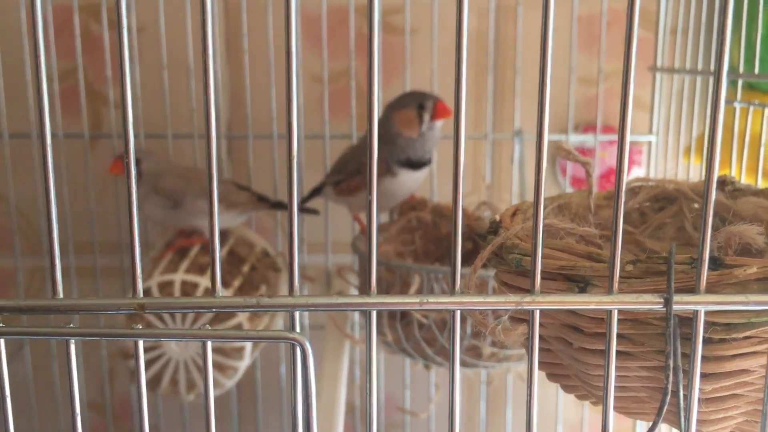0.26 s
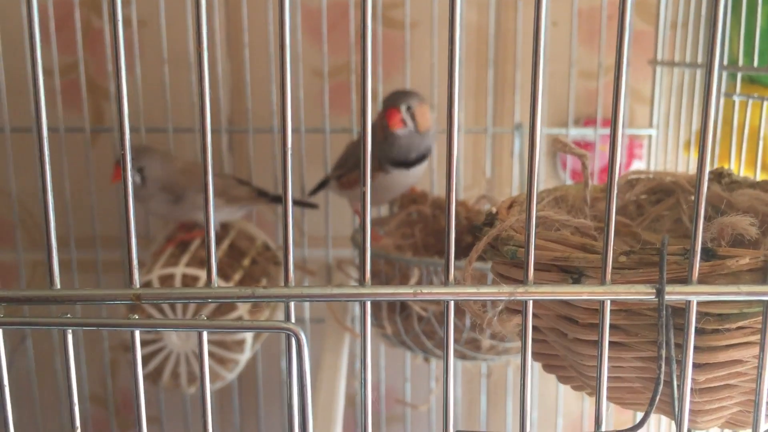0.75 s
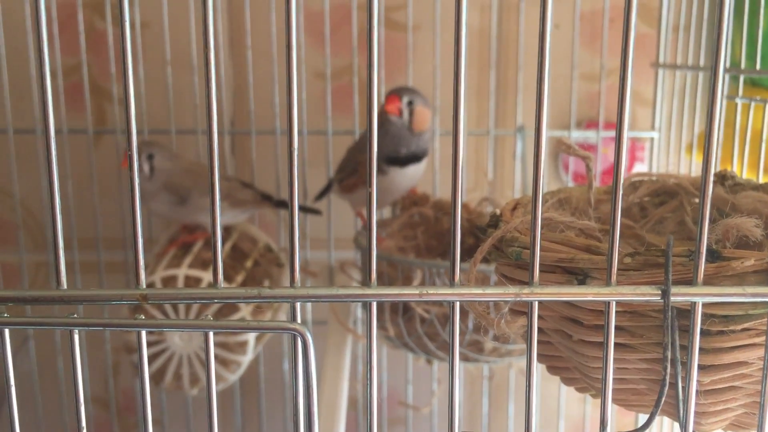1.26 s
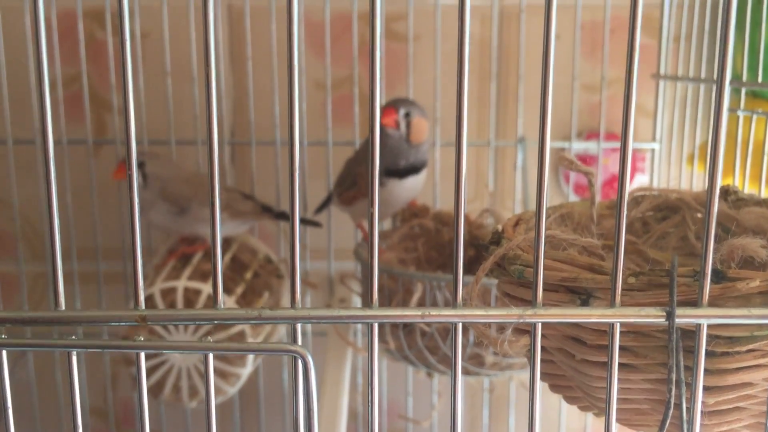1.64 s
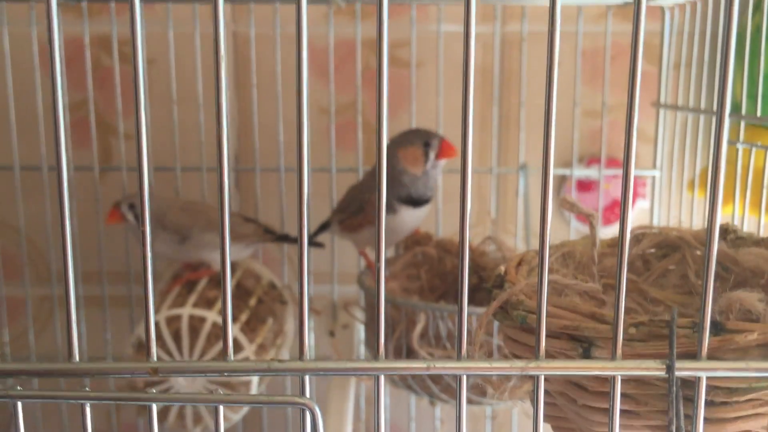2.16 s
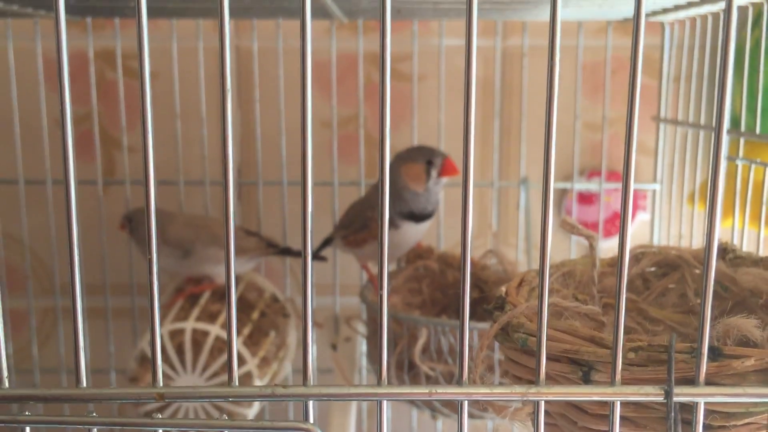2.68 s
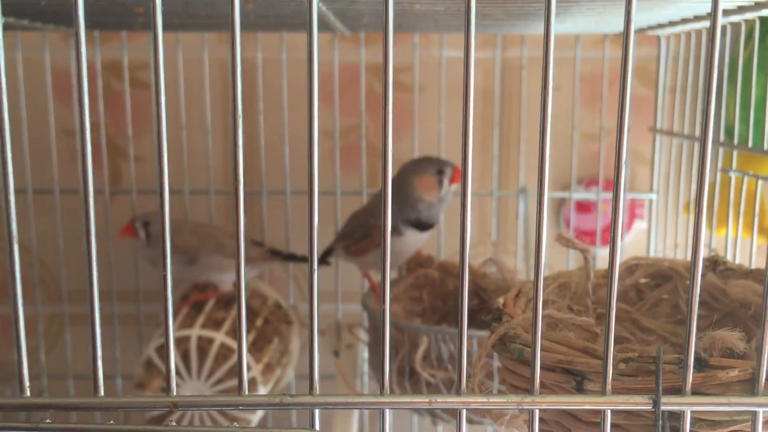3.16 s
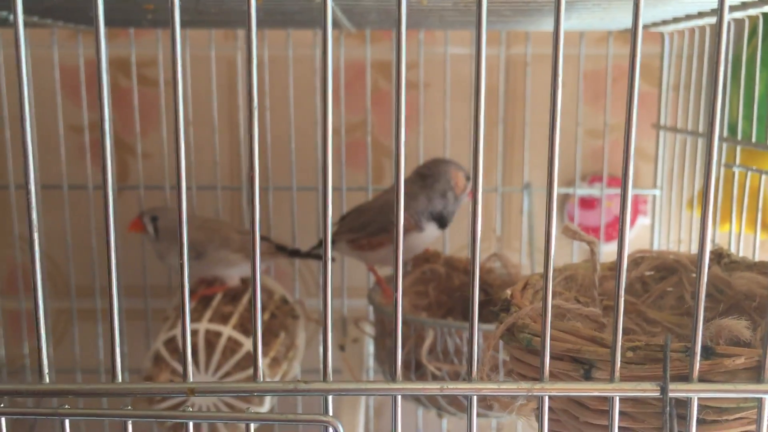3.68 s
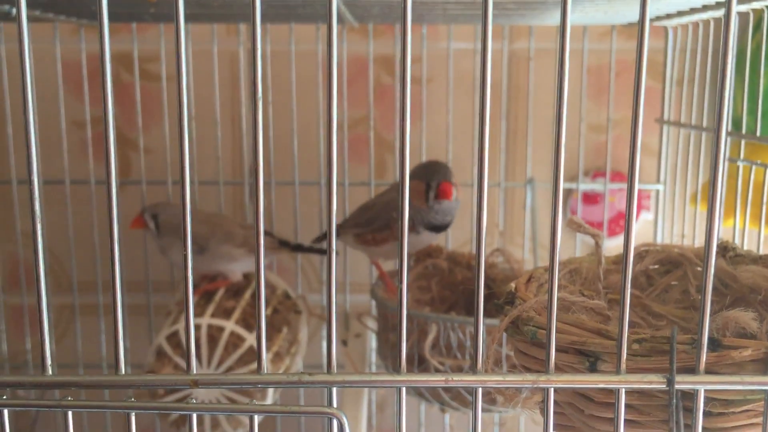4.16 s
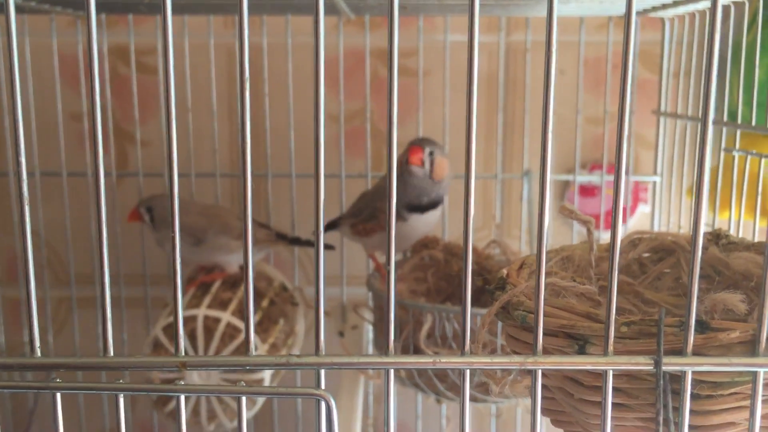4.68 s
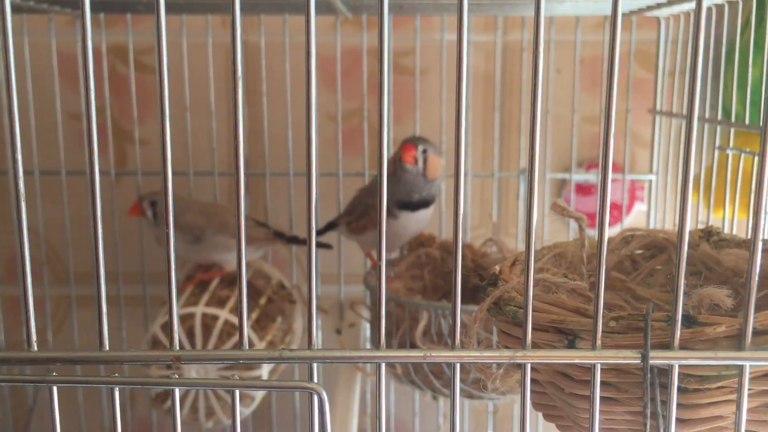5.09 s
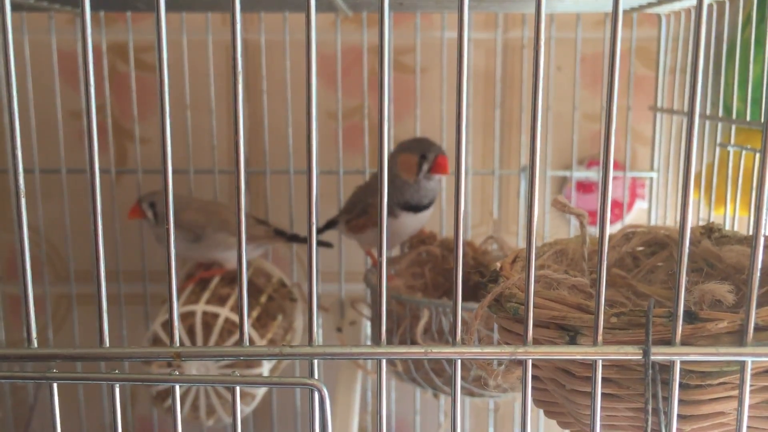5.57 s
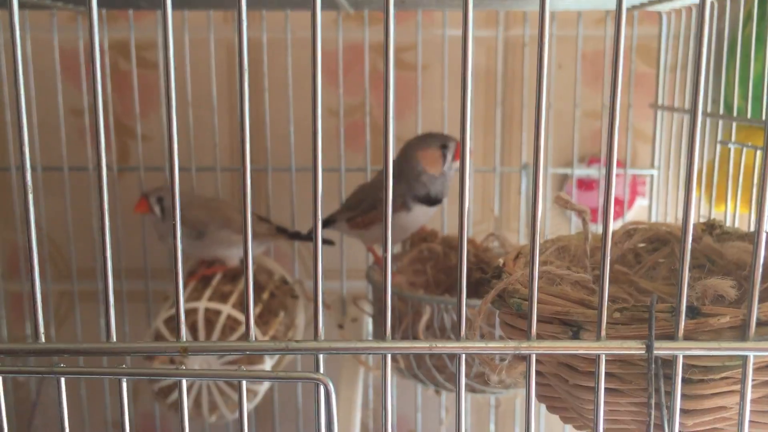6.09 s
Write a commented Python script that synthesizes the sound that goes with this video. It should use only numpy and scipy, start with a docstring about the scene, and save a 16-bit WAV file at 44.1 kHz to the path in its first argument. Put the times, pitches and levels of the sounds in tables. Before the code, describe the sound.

Close to a cage indoors, a small finch repeats a short phrase of rasps, thin whistles and nasal buzzes three times, its claws lightly scratching now and then. In the middle it switches to separate calls, two sharp falling cries and a harsh croak, then sings the phrase twice more. Soft room air and a faint electrical hum lie behind, with a slight echo from the walls.

```python
"""A young zebra finch sings in a cage in a small room, over air, mains hum and a low rumble. Pulses of the
syrinx ring its throat and beak; near surfaces and walls answer. It opens with two runs of its motif (slur,
stack, two-voiced rasp, whistle, slur, buzz, long nasal note); claws scratch and faint tones ring. A call and a
slur lead to a third run at 2 s, and another bird peeps softly. From 3 s come a call, a whine, a loud falling
cry, a call, a second cry and a croak. Two more runs close the scene from 5 s."""
import sys
import numpy as np
from scipy import signal
from scipy.fft import rfft, irfft
from scipy.io import wavfile
from scipy.ndimage import uniform_filter1d

SR = 44100
rng = np.random.default_rng(int(sys.argv[2]) if len(sys.argv) > 2 else 0)


def materialize(psi):
    """Save the field psi as 16-bit PCM at rate SR to the path in sys.argv[1].

    A 1-D psi becomes a single channel; in a 2-D psi each row is a channel.
    """
    bounded = np.clip(np.atleast_2d(psi).T, -1, 1)
    quanta = np.round(bounded * 32767).astype(np.int16)
    wavfile.write(sys.argv[1], SR, quanta)


N = 279153
TOP_HZ = 16100


def undb(db):
    """Decibels to gain."""
    return 10 ** (np.asarray(db) / 20)


def unit(x):
    """Scale to rms 1."""
    return x / np.sqrt(np.mean(x ** 2) + 1e-18)


def add(out, start_s, x):
    """Mix x into out from start_s on."""
    i = int(round(start_s * SR))
    x = x[max(-i, 0):max(N - i, 0)]
    out[max(i, 0):max(i, 0) + len(x)] += x


def wander(hz, count):
    """Random drift of rms 1, low-passed at hz."""
    lowpass = signal.butter(2, min(hz, SR / 3), fs=SR, output="sos")
    return unit(signal.sosfilt(lowpass, rng.standard_normal(count)))


def colour(x, points, tilt_db_oct=0, size=1024):
    """Minimum-phase filter through (frequency [Hz], gain [dB]) points, plus a tilt."""
    hz, db = np.transpose(points)
    octave = np.log2(np.maximum(np.fft.rfftfreq(size, 1 / SR), 1))
    curve_db = np.interp(octave, np.log2(hz), db + tilt_db_oct * np.log2(hz / hz.mean()))
    cepstrum = irfft(np.log(undb(curve_db)))
    cepstrum[1:size // 2] *= 2
    cepstrum[size // 2 + 1:] = 0
    return signal.fftconvolve(x, irfft(np.exp(rfft(cepstrum))))[:len(x)]


# Noise spectra: (frequency [Hz], relative level [dB])
AIR_SPECTRUM = [(15, -50.5), (25, -12.5), (166, -9), (190, -7), (229, -12), (301, -6), (405, -17.5),
                (451, -19.5), (659, -20), (754, -24), (1480, -19.5), (1610, -25), (2110, -22),
                (2910, -28.5), (16000, -40)]
RUMBLE_SPECTRUM = [(50, -23), (90, -15), (115, 1), (160, -13), (260, -14.5), (700, -22.5), (2000, -58.5)]
# Mains harmonics: (frequency [Hz], rms level [dB])
HUM_LINES = [(100, -84), (199.5, -71), (299.5, -69), (399, -79.5)]


def background(air_db=-63, waver_db=2, rest_db=-74.5, swell_db=-54, peak_s=0.66, rise_s=0.14, fall_s=0.55):
    """Room air, a wavering mains hum and a low rumble that swells once and dies back."""
    t = np.arange(N) / SR
    air = unit(colour(rng.standard_normal(N), AIR_SPECTRUM, size=8192)) * undb(air_db)
    hum = np.zeros(N)
    for hz, db in HUM_LINES:
        amplitude = np.sqrt(2) * undb(db + waver_db * wander(1.1, N))
        hum += amplitude * np.sin(2 * np.pi * hz * t + 0.88 * wander(7.4, N))
    swell = np.exp(-np.maximum((peak_s - t) / rise_s, (t - peak_s) / fall_s))
    rumble = unit(colour(rng.standard_normal(N), RUMBLE_SPECTRUM, size=8192))
    return air + hum + rumble * (undb(rest_db) + undb(swell_db) * swell)


def gesture(length_s, start_hz, turn_hz, turn_s, end_hz, glide_s,
            attack_s, swell_db, release_s, rough, rough_end, linger=1):
    """Tension and air pressure in a syllable: (time [s], pitch [Hz], level [dB], roughness [0-1])."""
    t = np.linspace(0, length_s, 200)
    glide = np.exp(-(np.maximum(t - turn_s, 0) / glide_s) ** linger)  # linger > 1 rounds the turn
    onset_hz = start_hz + (turn_hz - start_hz) * t / turn_s
    hz = np.where(t < turn_s, onset_hz, end_hz + (turn_hz - end_hz) * glide)
    pressure = np.clip(np.minimum(t / attack_s, (length_s - t) / release_s), 0.1, 1)
    db = 20 * np.log10(pressure) + swell_db * (t - length_s / 2) / length_s
    roughness = np.clip(rough + (rough_end - rough) * t / length_s, 0, 1)
    return np.column_stack([t, hz, db, roughness])


def syrinx(curve, throat, twin=0, air_db=0, pitch=1, stretch=1, tilt_db_oct=0,
           jitter=0.099, shimmer=0.65, smear_rad=0.11, pure_hz=2500, air_tilt_db_oct=2.5, edge_s=0.00068):
    """Uneven pulses and a puff of air once a cycle ring the throat; air pressure sets the level."""
    times, *columns = np.transpose(curve)
    times = np.maximum.accumulate(times - times[0]) * stretch
    t = np.arange(int(times[-1] * SR)) / SR
    hz, db, rough = (np.interp(t, times, column) for column in columns)
    hz = hz * pitch * (1 + jitter * rough * wander(900, len(t)))
    phase = 2 * np.pi * np.cumsum(hz) / SR
    k = np.arange(1, int(TOP_HZ / hz.min()) + 1)[:, None]
    twin_gain = 1 + twin * (-1.0) ** k  # a mid-cycle pulse weakens odd harmonics
    rolloff = k ** -(hz / pure_hz) ** 2  # tight membranes swing more like a sine
    harmonics = twin_gain * rolloff * (k * hz < TOP_HZ)
    pulses = (harmonics * np.cos(k * phase - smear_rad * k ** 2)).sum(0)  # high harmonics lag at closure
    pulses /= np.sqrt((harmonics ** 2).sum(0) / 2)
    puffs = (1 + np.cos(phase)) * rng.standard_normal(len(t)) * rough * undb(air_db)
    pulses *= 1 + shimmer * rough * wander(700, len(t))
    voice = colour(pulses, throat, tilt_db_oct) + colour(puffs, throat, tilt_db_oct + air_tilt_db_oct)
    power = uniform_filter1d(uniform_filter1d(voice ** 2, size=200), size=200)
    fade = np.clip(np.minimum(t, t[-1] - t) / edge_s, 0, 1)
    return voice / np.sqrt(power + 1e-12) * undb(db) * fade


# Near surfaces: (delay [s], gain re direct sound [ratio])
NEAR_ECHOES = [(.001, 0.048), (.0018, 0.16), (.0055, 0.11), (.01, 0.14)]


def room(x, wet_db, t60_s=0.25, build_s=0.007, treble_db=-3, cage_db=-3, cage_s=0.0012):
    """Cage scatter, near echoes and a short tail; new for each sound, as the bird keeps turning its head."""
    t = np.arange(SR // 2) / SR
    tail = rng.standard_normal(len(t)) * np.exp(-np.log(1000) * t / t60_s) * (1 - np.exp(-t / build_s))
    tail = colour(unit(tail), [(500, 0.45), (3500, 0.94), (9000, treble_db)])
    cage = unit(rng.standard_normal(len(t)) * t * np.exp(-t / cage_s))
    response = (undb(wet_db) * tail + undb(cage_db) * cage) / np.sqrt(len(t))
    response[0] += 1
    for delay_s, gain in NEAR_ECHOES:
        response[int(delay_s * SR)] += gain
    heard = signal.fftconvolve(x, response)
    return heard * np.linalg.norm(x) / np.linalg.norm(heard)


def sing(pitch=1, stretch=1, bright_db_oct=0, room_db=0, *,
         throat, db, tilt_db_oct, air_db, wet_db, twin=0, **shape):
    """One syllable in the room; pitch and stretch scale its nominal frequencies and times."""
    voice = syrinx(gesture(**shape), throat, twin, air_db, pitch, stretch, tilt_db_oct + bright_db_oct)
    return room(voice, wet_db + room_db) * undb(db)


# Throat and beak responses: (frequency [Hz], gain [dB])
OPEN_THROAT = [(300, -41.5), (540, -6.5), (1030, -2), (1560, -9), (2100, -1), (2900, -3), (4200, -14),
               (5400, -11.5), (7800, -11), (9700, -16), (12300, -27.5), (16000, -50)]
HARSH_THROAT = [(300, -29), (630, -18), (1270, -3.5), (1900, -10), (2250, -8.5), (3100, -0.5), (4300, -3),
                (5500, -3), (7500, -16.5), (9500, -18.5), (12000, -29), (16000, -51)]
ROUND_THROAT = [(500, -9.5), (1200, -13.5), (1800, -2.5), (3600, -13.5), (5400, -13), (7200, -24.5),
                (9000, -31), (16000, -61)]
SLUR = dict(length_s=0.057, start_hz=1160, turn_hz=997, turn_s=0.004, end_hz=391.5, glide_s=0.013,
            attack_s=0.013, swell_db=0, release_s=0.014, rough=0.05, rough_end=0.11,
            throat=OPEN_THROAT, db=-42, tilt_db_oct=0.5, air_db=-4, wet_db=-3.5)
STACK = dict(length_s=0.028, start_hz=601.4, turn_hz=653.4, turn_s=0.017, end_hz=486, glide_s=0.018,
             attack_s=0.0036, swell_db=3, release_s=0.0031, rough=0.06, rough_end=0.19, twin=0.34,
             throat=HARSH_THROAT, db=-31.5, tilt_db_oct=-2.5, air_db=-4, wet_db=0)
RASP = dict(length_s=0.029, start_hz=1395, turn_hz=1505, turn_s=0.017, end_hz=640, glide_s=0.024,
            attack_s=0.007, swell_db=1, release_s=0.0082, rough=0.81, rough_end=0.9,
            throat=HARSH_THROAT, db=-25, tilt_db_oct=1, air_db=0, wet_db=-5)
PIPE = dict(length_s=0.043, start_hz=1702, turn_hz=1770, turn_s=0.01, end_hz=1772, glide_s=0.012,
            attack_s=0.012, swell_db=2.5, release_s=0.0057, rough=0.13, rough_end=0.03,
            throat=ROUND_THROAT, db=-35, tilt_db_oct=3, air_db=2, wet_db=-11.5)
DROP = dict(length_s=0.025, start_hz=605, turn_hz=584, turn_s=0.004, end_hz=480, glide_s=0.02,
            attack_s=0.0011, swell_db=-6.5, release_s=0.002, rough=0.3, rough_end=0.38,
            throat=ROUND_THROAT, db=-38, tilt_db_oct=2, air_db=2, wet_db=-1)
# Motif, first half: (rasp time [s], slur lead [s], rasp pitch [ratio], pipe length [ratio],
# pipe gain [dB], room tail gain [dB])
MOTIF_OPENINGS = [(-.008, 0.1, 0.99, 1.01, 4, -1.5), (.761, 0.13, 1.125, 1.05, -.5, -0.5),
                  (2.098, .144, 0.94, 0.87, 1, 1.5), (5.14, .15, .99, 1.03, 3, -3),
                  (5.915, 0.15, 1.03, 0.9, 0.5, -2)]


def motif_openings(stack_lead_s=0.0402, pipe_lag_s=0.002, drop_lag_s=0.047):
    """Slur, stack, then rasp and pipe from the two sides of the syrinx at once, ending in a low drop."""
    out = np.zeros(N)
    for s, slur_lead_s, rasp_pitch, pipe_stretch, pipe_db, room_db in MOTIF_OPENINGS:
        add(out, s - slur_lead_s, sing(**SLUR))
        add(out, s - stack_lead_s, sing(room_db=room_db, **STACK))
        add(out, s, sing(rasp_pitch, room_db=room_db, **RASP))
        add(out, s + pipe_lag_s, sing(stretch=pipe_stretch, room_db=room_db, **PIPE) * undb(pipe_db))
        add(out, s + drop_lag_s * pipe_stretch, sing(room_db=room_db, **DROP))
    return out


def crack(spectrum, decay_s):
    """A very short burst of coloured noise."""
    t = np.arange(SR // 40) / SR
    return colour(rng.standard_normal(len(t)) * np.exp(-t / decay_s), spectrum)


# Throat and beak responses: (frequency [Hz], gain [dB])
THIN_THROAT = [(1500, -37), (2800, -5), (5600, 2), (8400, -15), (11200, -14.5), (14000, -38), (16000, -41)]
PULSE_THROAT = [(400, -17.5), (800, -5), (1300, -1.5), (2200, -2.5), (3200, 1.5), (4400, -1.5), (6200, -4),
                (8000, -23), (16000, -33)]
NASAL_THROAT = [(300, -35), (455, -23), (900, -12), (1340, -3), (1750, -11), (2250, 0), (3100, 0),
                (4160, -2), (5000, -11.5), (5900, -19.5), (7800, -28.5), (9300, -18.5), (11100, -38),
                (16000, -45)]
WHISTLE = dict(length_s=0.021, start_hz=2940, turn_hz=2792, turn_s=0.0025, end_hz=2721, glide_s=0.0049,
               attack_s=0.0023, swell_db=-4.5, release_s=0.0073, rough=0.022, rough_end=0.02,
               throat=THIN_THROAT, db=-23.5, tilt_db_oct=-0.5, air_db=10, wet_db=-6)
FLICK = dict(length_s=0.0091, start_hz=4600, turn_hz=4210, turn_s=0.00233, end_hz=2836, glide_s=0.00195,
             attack_s=0.001, swell_db=2.5, release_s=0.0018, rough=0.03, rough_end=0.05,
             throat=HARSH_THROAT, db=-28, tilt_db_oct=-0.5, air_db=-4, wet_db=3)
BUZZ = dict(length_s=0.038, start_hz=1593.5, turn_hz=1093, turn_s=0.004, end_hz=613.5, glide_s=0.003,
            attack_s=0.003, swell_db=-1, release_s=0.006, rough=0.48, rough_end=0.2,
            throat=HARSH_THROAT, db=-28.2, tilt_db_oct=-1, air_db=7, wet_db=-4.5)
NASAL = dict(length_s=0.142, start_hz=418.4, turn_hz=408, turn_s=0.015, end_hz=456.4, glide_s=0.024,
             attack_s=0.023, swell_db=3, release_s=0.013, rough=0.14, rough_end=0.27,
             throat=NASAL_THROAT, db=-31, tilt_db_oct=0.5, air_db=-17, wet_db=-4.5)
# Lone syrinx pulses: (lead before the flick [s], relative level [dB])
LONE_PULSES = [(0.018, -16.5), (.0085, -12.5)]
# Motif, second half: (whistle time [s], whistle pitch [ratio], whistle length [ratio],
# whistle tilt [dB/oct], slur pitch [ratio], flick and buzz pitch [ratio], nasal pitch [ratio],
# nasal length [ratio], nasal gain [dB], extra nasal swell [dB])
MOTIF_ENDINGS = [(.081, 0.99, 1.07, 1.5, 0.95, 1, 1, 1.01, 1, 0.5),
                 (0.857, 0.98, 0.88, 0, 1.13, 0.97, .985, 0.92, -0.5, 1.5),
                 (2.192, 1.044, 1.36, 2, 1.07, 1.01, 1.005, 1.03, 0, -0.5),
                 (5.233, 1.012, 0.94, 3, 1.04, 1.015, .995, 0.97, 0, 3),
                 (6.006, 0.98, 1.02, 2, 1.12, 1, 1.005, 1.6, 3, -1.5)]


def motif_endings(slur_lag_s=0.029, flick_lag_s=0.152, buzz_lag_s=0.162, nasal_lag_s=0.291,
                  slur_gain_db=0.5, pulse_gain_db=-6):
    """Whistle, slur, two lone pulses of the syrinx, a flick down into the buzz, and the long nasal note."""
    out = np.zeros(N)
    for (s, pitch, stretch, bright_db_oct, slur_pitch, buzz_pitch,
         nasal_pitch, nasal_stretch, nasal_db, swell_db) in MOTIF_ENDINGS:
        add(out, s, sing(pitch, stretch, bright_db_oct, **WHISTLE))
        add(out, s + slur_lag_s, sing(slur_pitch, bright_db_oct=1.03, **SLUR) * undb(slur_gain_db))
        for lead_s, pulse_db in LONE_PULSES:
            pulse = room(crack(PULSE_THROAT, decay_s=0.0017), wet_db=-0.5)
            add(out, s + flick_lag_s - lead_s, pulse * undb(pulse_db + pulse_gain_db))
        add(out, s + flick_lag_s, sing(buzz_pitch, **FLICK))
        add(out, s + buzz_lag_s, sing(buzz_pitch, **BUZZ))
        nasal = dict(NASAL, swell_db=NASAL["swell_db"] + swell_db)
        add(out, s + nasal_lag_s, sing(nasal_pitch, nasal_stretch, **nasal) * undb(nasal_db))
    return out


# Crack spectrum: (frequency [Hz], gain [dB])
SCRATCH_SPECTRUM = [(500, -17), (2000, 10), (4000, 1), (6500, 5), (9000, 4), (12500, 7.5), (16000, -2)]
# Contacts: (time [s], relative level [dB], skid length [s])
SCRATCH_CONTACTS = [(.462, -24.5, 0.008), (.4726, -20, 0.027), (0.595, -32, .02), (1.895, -32.5, 0.0094),
                    (1.938, -24.5, .04), (4.526, -46, 0.005), (4.749, -32.5, .004)]


def scratches(decay_s=0.004, gain_db=-9, wet_db=-5, skid_db=-10, scatter_db=3, skid_cracks=4):
    """Claws and bill on perch and wire: a bright crack, then weaker ones as the claw skids."""
    out = np.zeros(N)
    for s, db, skid_s in SCRATCH_CONTACTS:
        add(out, s, room(crack(SCRATCH_SPECTRUM, decay_s), wet_db) * undb(db + gain_db))
        for share in (np.arange(skid_cracks) + rng.random(skid_cracks)) / skid_cracks:
            gain = undb(db + gain_db + skid_db + scatter_db * rng.standard_normal())
            add(out, s + share * skid_s, room(crack(SCRATCH_SPECTRUM, decay_s), wet_db) * gain)
    return out


# Dull background tones: (peak time [s], frequency [Hz], 1/e half-width [s], peak level [dB])
RING_TONES = [(0.603, 1086, 0.024, -47.5), (0.688, 1306, 0.034, -42.5), (0.714, 817, 0.042, -47),
              (0.8, 116.6, 0.028, -51), (0.944, 189.4, 0.035, -65), (4.875, 162.2, 0.059, -54.5),
              (5.474, 206, 0.084, -53), (6.002, 238.2, 0.048, -54.5)]


def rings(waver_rad=1.0):
    """Faint, unsteady tones that swell and fade."""
    t = np.arange(N) / SR
    out = np.zeros(N)
    for peak_s, hz, half_s, db in RING_TONES:
        envelope = undb(db) * np.exp(-((t - peak_s) / half_s) ** 2)
        out += envelope * np.sin(2 * np.pi * hz * t + waver_rad * wander(40, N))
    return out


# Throat and beak responses: (frequency [Hz], gain [dB])
CALL_THROAT = [(300, -32), (530, -17), (1030, -7), (1560, -4.5), (2100, -2), (2900, -1), (4200, -7),
               (5400, -8), (7800, -10.5), (9700, -10), (12300, -17), (16000, -36)]
PEEP_THROAT = [(1000, -29), (2150, -13), (3200, 9), (4300, 1), (5400, -14), (16000, -40)]
CRY_THROAT = [(400, -35.5), (700, -16), (1000, -9.5), (1900, -8.5), (2500, -8), (3050, 0.5), (4050, -1),
              (5000, -11), (6100, -19.5), (7800, -30), (10000, -24.5), (12500, -36.5), (16000, -54)]
CALL = dict(length_s=0.041, start_hz=525, turn_hz=542, turn_s=0.012, end_hz=326, glide_s=0.037, linger=2.6,
            attack_s=0.018, swell_db=5, release_s=0.0014, rough=0.081, rough_end=0.12,
            throat=CALL_THROAT, db=-30.5, tilt_db_oct=0, air_db=-1, wet_db=-5)
PEEP = dict(length_s=0.065, start_hz=1030, turn_hz=1012, turn_s=0.041, end_hz=990, glide_s=0.035,
            attack_s=0.017, swell_db=2, release_s=0.016, rough=0.05, rough_end=0.05,
            throat=PEEP_THROAT, db=-42.5, tilt_db_oct=0, air_db=-3, wet_db=-9)
CRY = dict(length_s=0.11, start_hz=1864, turn_hz=2026, turn_s=0.011, end_hz=567.4, glide_s=0.044,
           linger=1.9, attack_s=0.0064, swell_db=-11, release_s=0.012, rough=0.22, rough_end=0.12,
           throat=CRY_THROAT, db=-22, tilt_db_oct=4, air_db=6.5, wet_db=-4)
# Notes outside the motif: (time [s], syllable, pitch [ratio], length [ratio], gain [dB])
SINGLE_NOTES = [(1.676, CALL, 1.01, 0.73, 0), (1.83, SLUR, 1.04, 0.89, 2.5), (2.236, PEEP, 1, 0.87, 2),
                (3.084, CALL, 1, 1.03, -2), (3.494, CRY, 1.015, 0.97, 0.65),
                (4.256, CALL, 1.02, 0.84, -1.5), (4.583, CRY, 0.98, 1.086, -0.4)]


def single_notes():
    """Short calls, a slur, a soft peep from another bird and two loud falling cries."""
    out = np.zeros(N)
    for s, syllable, pitch, stretch, db in SINGLE_NOTES:
        add(out, s, sing(pitch, stretch, **syllable) * undb(db))
    return out


def wavering_note(curve, throat, rough, rough_end, air_db, tilt_db_oct, wet_db):
    """A long syrinx note of unsteady pitch; roughness ramps from rough to rough_end."""
    out = np.zeros(N)
    s, hz, db = np.transpose(curve)
    roughness = np.interp(s, [s[0], s[-1]], [rough, rough_end])
    voice = syrinx(np.column_stack([s, hz, db, roughness]), throat, air_db=air_db, tilt_db_oct=tilt_db_oct)
    add(out, s[0], room(voice, wet_db))
    return out


# Throat and beak response: (frequency [Hz], gain [dB])
WHINE_THROAT = [(300, -33), (440, -18), (870, -12), (1300, -6.5), (1750, 1.5), (2200, 3), (2700, -2.5),
                (4200, -5.5), (5500, -22.5), (7500, -25), (9000, -30), (16000, -49.5)]
# Whine: (time [s], pitch [Hz], level [dB])
WHINE_CONTOUR = [(3.233, 439, -54), (3.241, 437.0, -38), (3.249, 424, -45), (3.309, 432, -34.5),
                 (3.325, 455, -35.5), (3.347, 458, -34.5), (3.361, 424, -37.5), (3.37, 434, -40)]


def whine():
    """A muffled, wavering note that grows rougher."""
    return wavering_note(WHINE_CONTOUR, WHINE_THROAT, rough=0.0492, rough_end=0.29,
                         air_db=0.5, tilt_db_oct=0, wet_db=-5.5)


# Throat and beak response: (frequency [Hz], gain [dB])
CROAK_THROAT = [(300, -30), (480, -28), (980, -11), (1500, -9), (2200, -9), (2950, 2), (3900, -7),
                (5000, -8.5), (6000, -19.5), (8000, -29), (9500, -19), (12500, -35), (16000, -40)]
# Croak: (time [s], pitch [Hz], relative level [dB])
CROAK_CONTOUR = [(4.784, 466, -35), (4.792, 474.8, -34.5), (4.808, 492.6, -26), (4.82, 475, -30.5),
                 (4.842, 493, -28), (4.864, 488, -27), (4.874, 545, -33), (4.895, 535, -31)]


def croak(gain_db=-0.5):
    """A harsh, breathy note that wavers upward."""
    return wavering_note(CROAK_CONTOUR, CROAK_THROAT, rough=0.23, rough_end=0.19,
                         air_db=4.5, tilt_db_oct=0.5, wet_db=-4.5) * undb(gain_db)


def scene():
    """The finch, a softly peeping second bird and the room, in mono, from just outside the cage."""
    mix = background() + motif_openings() + motif_endings() + scratches() + rings()
    return (mix + single_notes() + whine() + croak())[None]


def record(dry):
    """Band limit: 36 Hz to TOP_HZ."""
    highpass = signal.butter(3, 36, "high", fs=SR, output="sos")
    lowpass = signal.ellip(10, 0.2, 70, TOP_HZ, fs=SR, output="sos")
    return signal.sosfilt(lowpass, signal.sosfilt(highpass, dry))


dry = scene()
out = record(dry)
materialize(out)
```